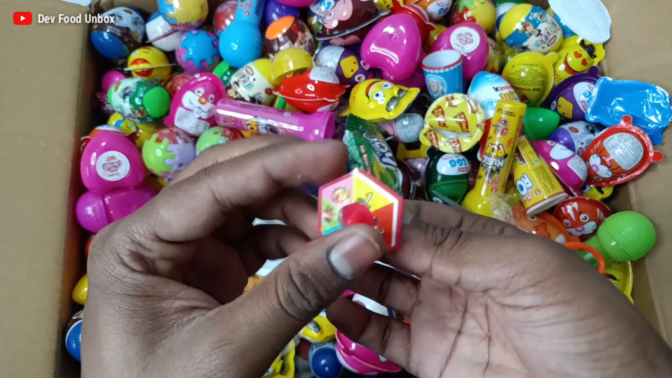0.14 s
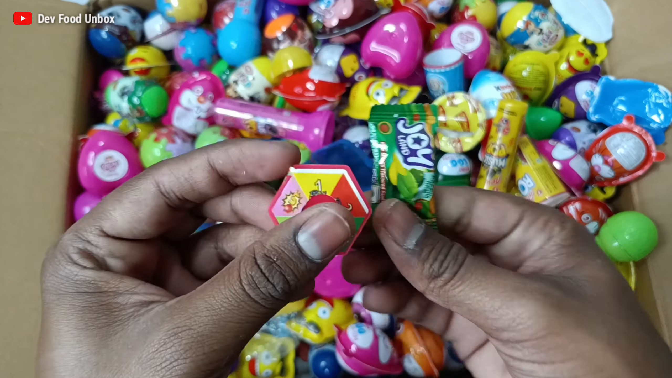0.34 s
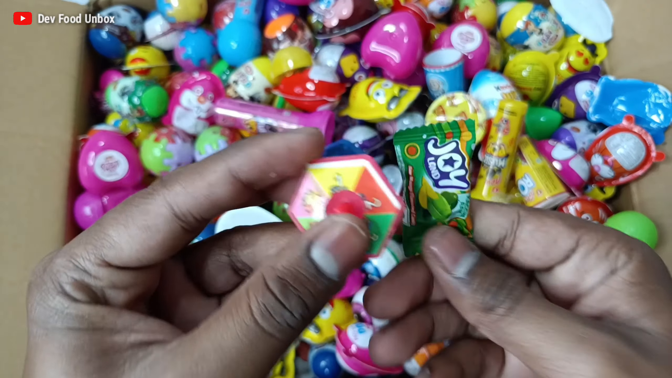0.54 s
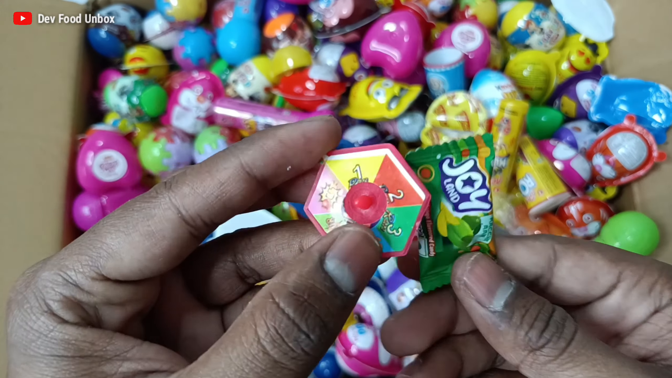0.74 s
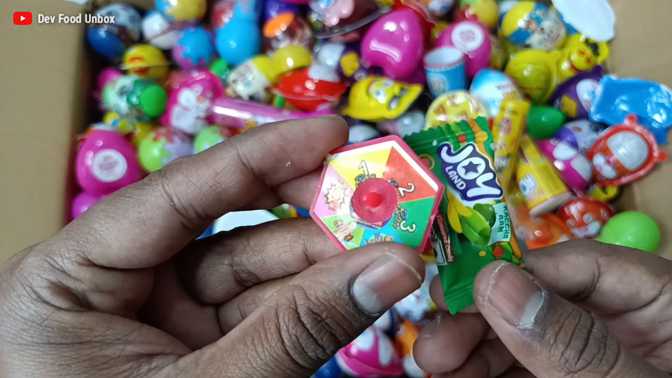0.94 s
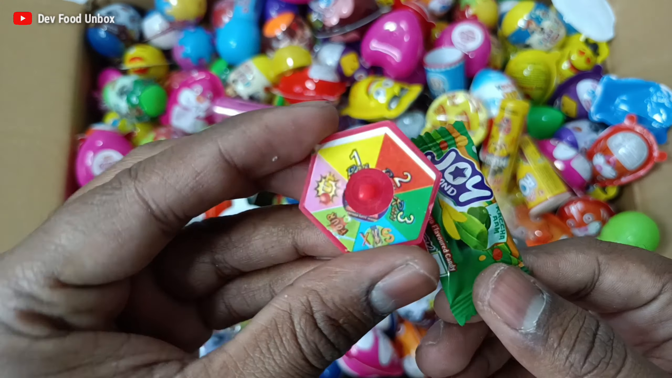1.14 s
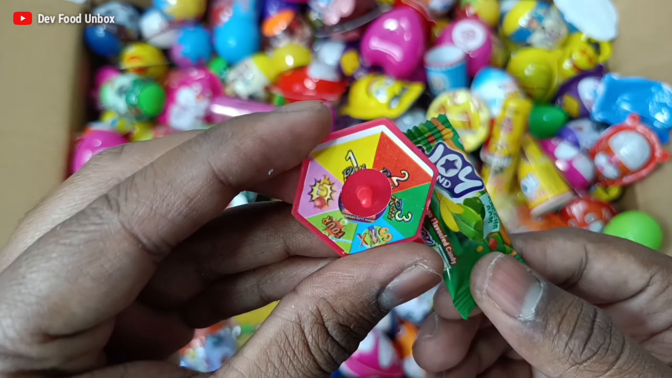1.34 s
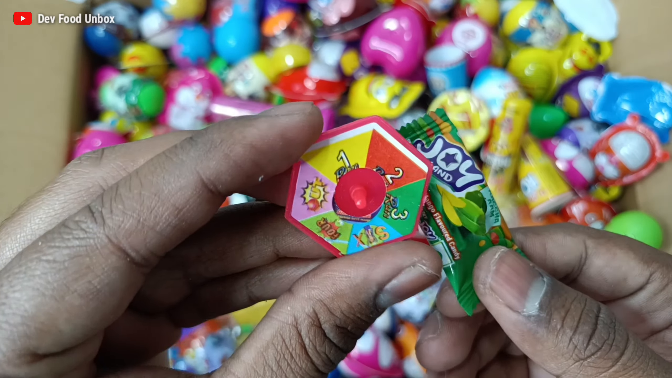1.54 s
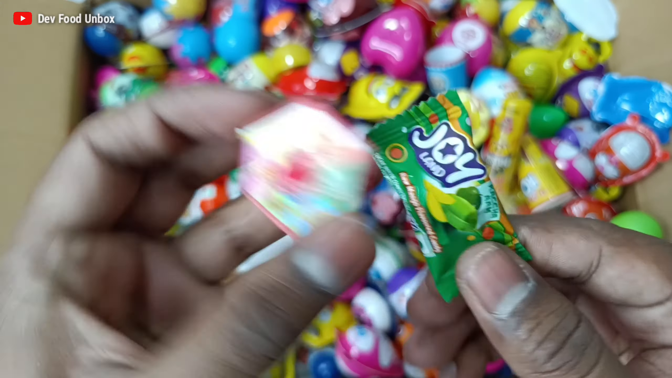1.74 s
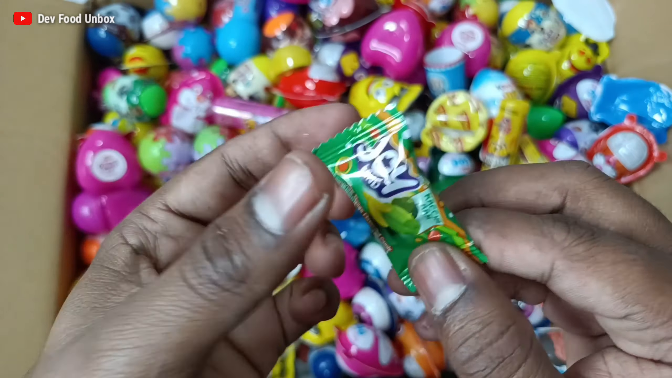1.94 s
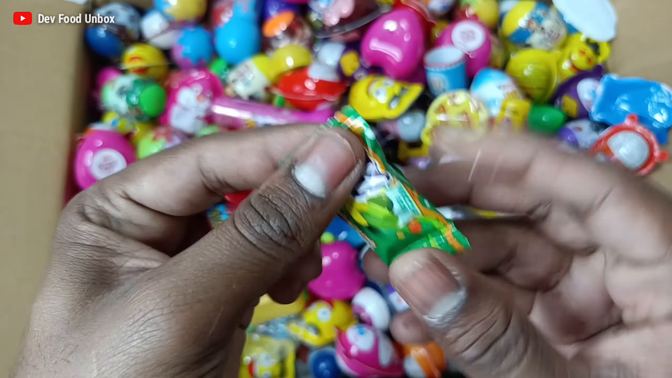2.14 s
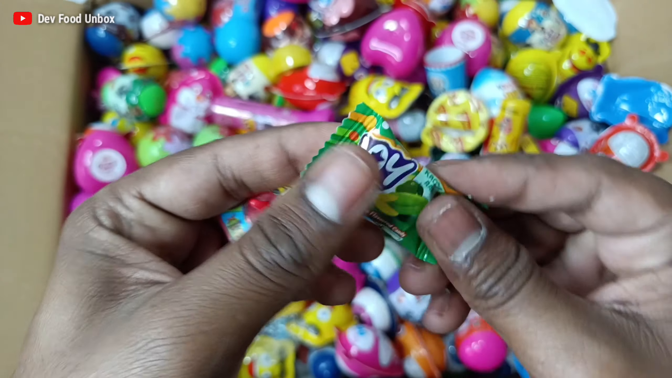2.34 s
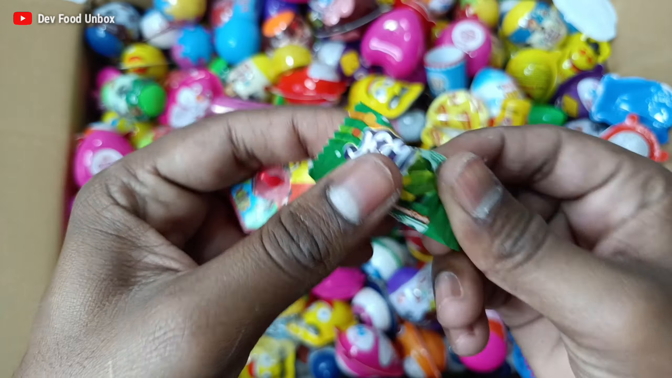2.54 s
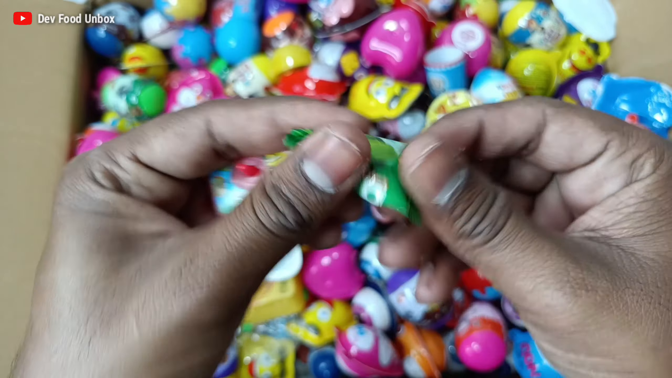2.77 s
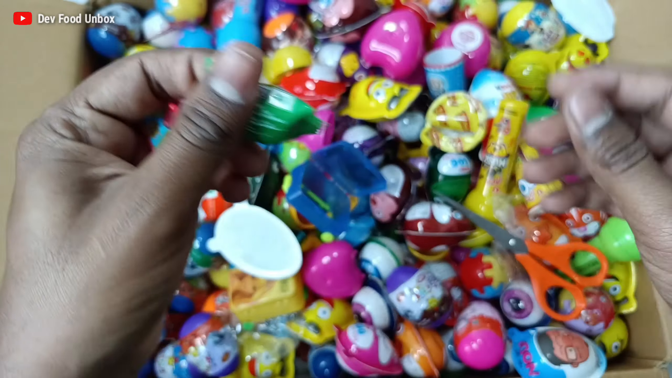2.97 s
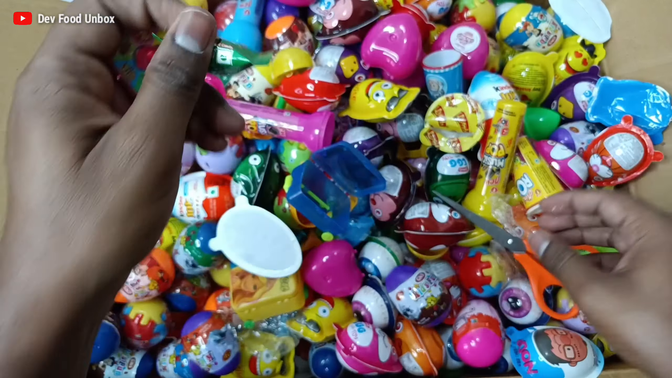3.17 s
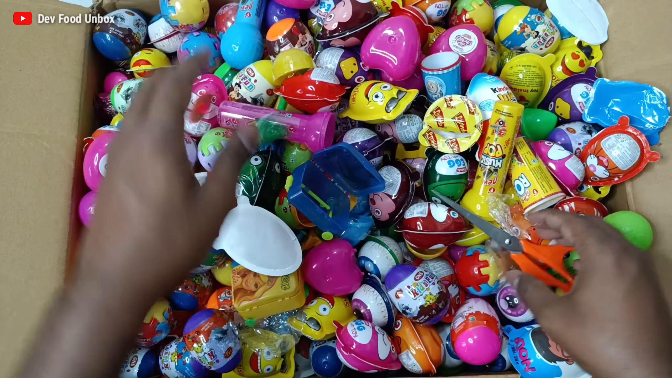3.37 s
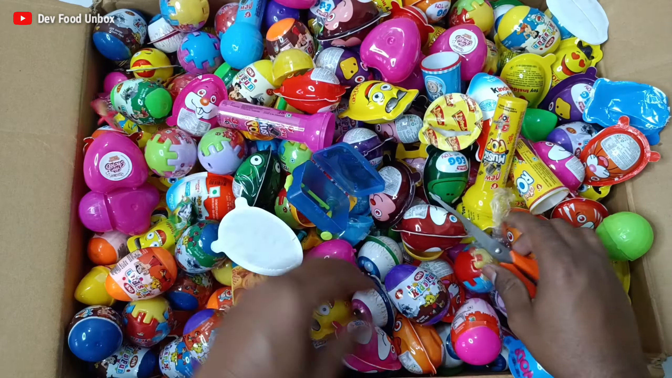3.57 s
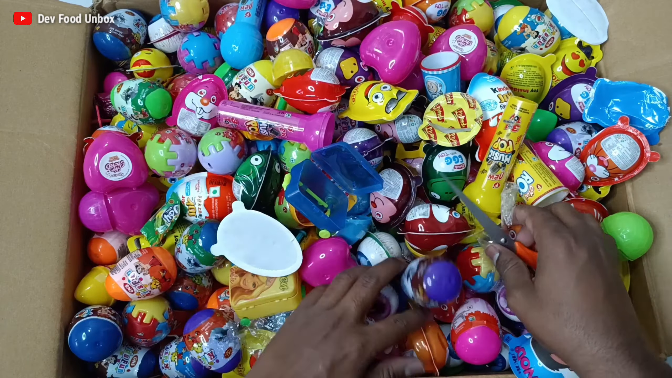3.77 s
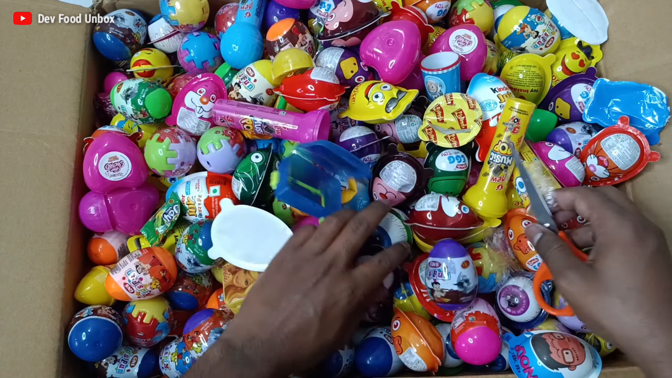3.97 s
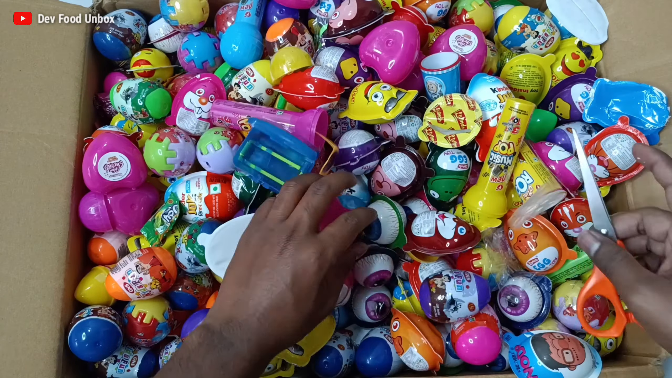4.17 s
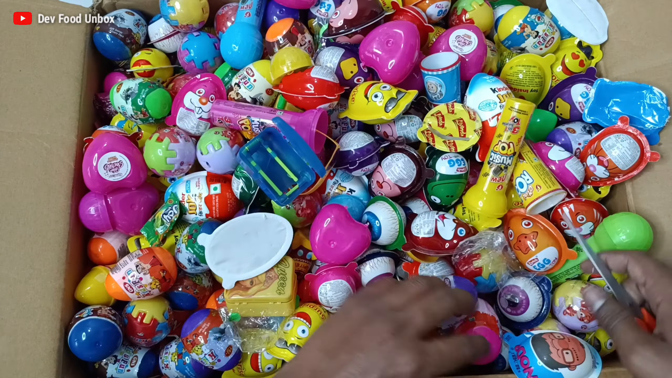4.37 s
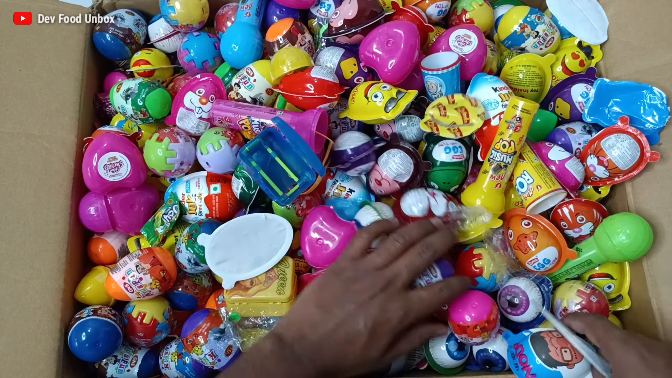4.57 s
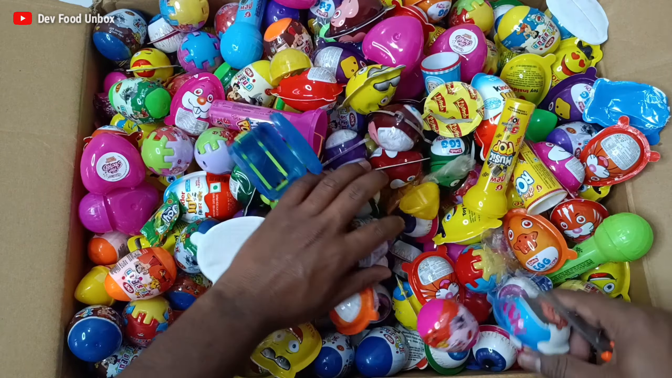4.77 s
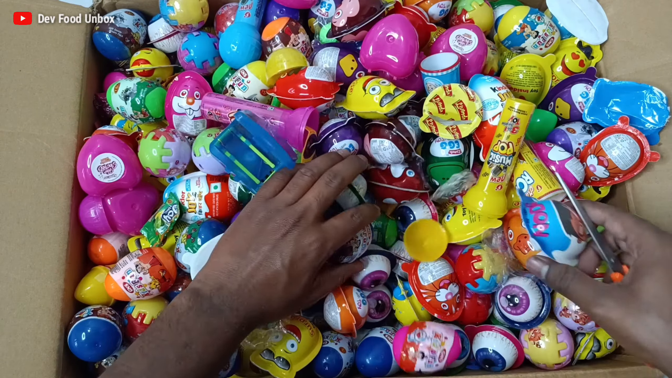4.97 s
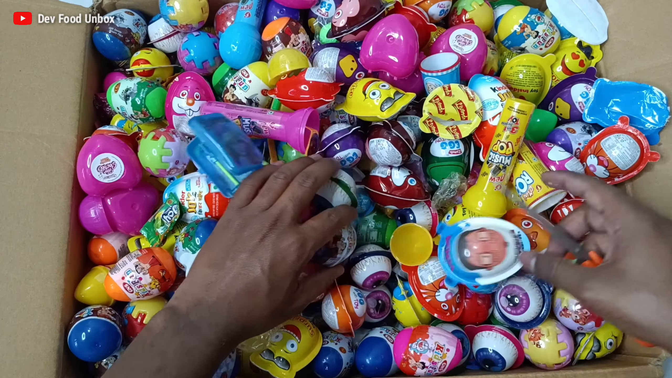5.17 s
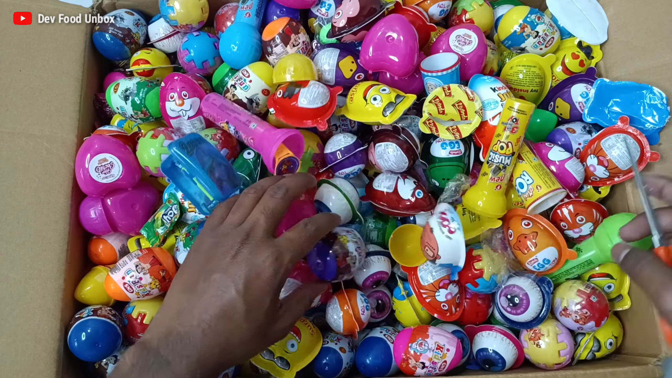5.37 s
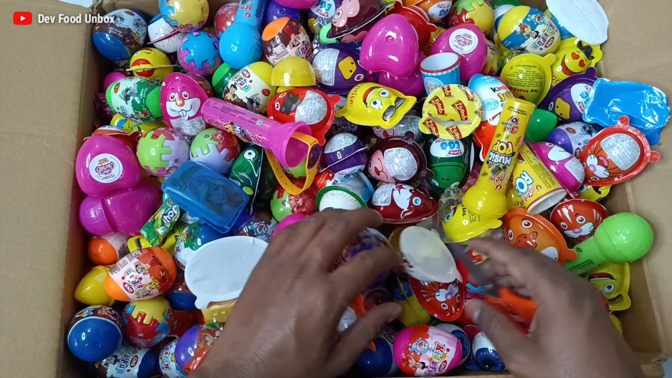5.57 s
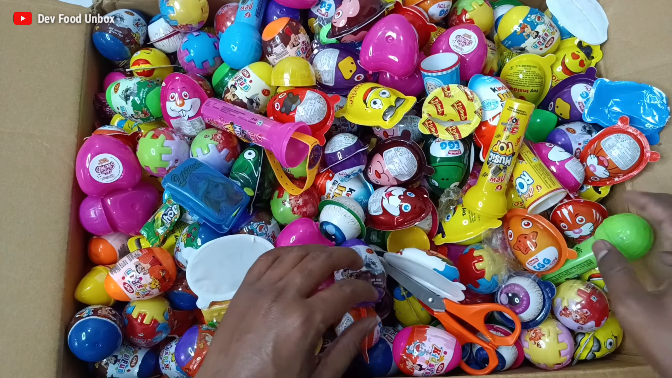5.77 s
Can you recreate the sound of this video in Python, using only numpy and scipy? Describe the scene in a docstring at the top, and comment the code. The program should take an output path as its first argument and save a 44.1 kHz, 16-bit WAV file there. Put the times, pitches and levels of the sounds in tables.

```python
"""Film wrapper snaps and crackles close up over faint air, then stirs again; a rummage through hollow toys follows.
Snaps are short ringing pulses let go in uneven steps; crackle, heap and fingers are random puffs of noise.
The packet thumps and shells knock as decaying sines with a noise tick, the cardboard box booms as resonant noise,
and a scissor hinge squeaks once as a wobbling harmonic tone.
A hard room answers with short bright tails of noise, and one wall with a single echo."""
import sys
import numpy as np
from scipy import signal
from scipy.fft import rfft, irfft, next_fast_len
from scipy.io import wavfile
from scipy.ndimage import uniform_filter1d

SR = 44100
rng = np.random.default_rng(int(sys.argv[2]) if len(sys.argv) > 2 else 0)


def master(y):
    """Save y as 16-bit WAV."""
    cut = np.clip(np.atleast_2d(y).T, -1, 1)
    pcm = np.round(cut * 32767)  # scale
    wavfile.write(sys.argv[1], SR, pcm.astype(np.int16))


N = 256220  # length in samples

# Levels are mix settings; the functions may trim them by a fixed amount.
# Background air: f/Hz, relative level per Hz/dB
AIR_SPECTRUM = [(20, -12), (50, -17), (73, 3.5), (95, -6), (145, -5), (230, -7), (300, -10.5), (480, -14.5),
                (700, -17.5), (1800, -23.5), (4000, -28), (16000, -35)]
AIR_DB = -63.5  # rms
# Dull rub of fingers, one curve per passage: t/s, level/dB
HAND_RUB = [
    [(0.038, -34.5), (0.126, -60), (0.65, -61.5), (1.004, -71.5), (1.1, -67)],
    [(2.15, -67), (2.236, -53), (2.356, -62), (2.904, -50.5), (3.092, -65.5), (3.352, -57), (3.5, -56)],
]
# Film crackle before it is split by pitch: f/Hz, relative level per Hz/dB
FILM_SPECTRUM = [(290, -30), (500, 6), (668, -19.5), (843, -7), (2260, -3), (4660, -0.5), (5090, -1),
                 (5880, -2.5), (14500, -18.5), (16000, -18)]
# Fingers squeeze the film: t of peak/s, level/dB, time to die by 30 dB/s, brightness/dB
SQUEEZES = [(0.053, -48, 0.28, -2.5), (0.355, -61, .06, -5), (0.394, -53.5, 0.11, -4), (0.7, -52, .1, 0),
            (2.23, -47, .1, 5), (2.355, -45, 0.2, -4), (2.435, -39.5, 0.16, 2), (2.585, -44.5, 0.03, 7),
            (2.615, -37.5, .3, 3), (2.7, -45, .15, 0), (2.795, -38, 0.05, 5), (2.835, -37.5, .15, -5.5),
            (2.88, -39, 0.33, 3), (2.97, -48, 0.04, 1.5), (3.08, -60, .12, -5), (3.252, -49.5, 0.3, 4.5),
            (3.325, -44.5, 0.4, -0.5), (3.502, -37, 0.13, -3.5)]
SQUEEZE_RISE_S = .015  # time to grow by 30 dB
RUSTLE_TREBLE_DB, RUSTLE_LOW_DB = 6, 7  # trims against the middle of the crackle
# A faint brush of film: t/s, level/dB
STIR = [(1.92, -94), (1.945, -67), (1.97, -69), (2.01, -93)]
# A hand pushes through the heap, one curve per passage: t/s, effort level/dB, then against effort:
# shells level/dB, box boom level/dB, wrappers level/dB; last, wrapper brightness/dB
RUMMAGE = [
    [(0.038, -38, -5, -0.6, -11, 3), (0.112, -38, -5, -1.5, -11, -2.5), (0.19, -48.5, -12, -2, -12, 0),
     (0.218, -52, -11, 9.5, -15, 0), (0.25, -76, 5, -6, -9, 0)],
    [(3.5, -38.5, -15, -6, -5, -0.5), (3.56, -32, -16, -7.5, -9.5, 0), (3.65, -34, -3, -13, -8, 1),
     (3.73, -41, 2.5, 3, -3, 2.5), (3.81, -33.5, -2.5, -5.5, -12.5, 1.5), (3.9, -33, -1.5, -5, -13, 0),
     (3.98, -30, 0.5, -9, -15, 1), (4.09, -28, 0.5, -11, -16, -2), (4.22, -28, -7.5, -7, -12.5, -4),
     (4.38, -44, -2.5, -3, -8.5, 0), (4.42, -50, -1.5, 9, -5, -1), (4.53, -56, 3, 0, -8.5, -2.5),
     (4.615, -45.5, 0, 5.5, -10.5, -1), (4.635, -35.5, 6, 4, -11.5, 0), (4.7, -26, -3, -18, -15, 0),
     (4.77, -22.5, -7, -22.5, -14, -2), (4.9, -27.5, -9, -12, -13.5, -1.5),
     (4.99, -34, 0.5, -6, -10.5, -3.5), (5.02, -42.5, 0, -3, 4, -6), (5.08, -37.5, 3.5, 0.5, -9.5, -5.5),
     (5.165, -36, -3, -6, -12, -9), (5.185, -36, -3, -6, -9, 3), (5.28, -34.5, -5, -13.5, -12.5, -2),
     (5.47, -42.5, -5, -11, -11, -1.5), (5.51, -33, -7, -18, -15.5, 0), (5.64, -33, -1, -8, -16, -1),
     (5.68, -44, -5, -10, -10, -3), (5.73, -25, -3.5, -8, -12.5, -2), (5.81, -28.5, -5, 5, -17.5, -3)],
]
# Which toys are moving: t/s, favoured shell f/Hz, favoured wall f/Hz
MOVING_TOYS = [(3.5, 500, 1600), (3.9, 540, 1120), (4.2, 480, 1560), (4.5, 400, 1360), (4.75, 380, 2200),
               (5.16, 323, 1520), (5.55, 410, 1690), (5.7, 440, 1280)]
# Resonances of shell cavities, shell walls and the cardboard box: f/Hz, width setting/Hz, level/dB
SHELL_MODES = [(310, 102, 5), (389, 93, -1), (544, 130, 1.5), (640, 178, -2.5), (212, 34, -15),
               (777, 300, -11)]
WALL_MODES = [(1005, 244, 6.5), (1252, 100, 0.5), (1458, 190, 4), (1770, 325, 3), (2200, 200, 4),
              (2500, 300, -4)]
BOX_MODES = [(119, 24, 9), (164, 42, -6.5), (76, 51, -3.5)]
# Buckling creases and sharp plastic ticks: t/s, peak level/dB, ring f/Hz, sharpness Q setting,
# broad crack setting against ring/dB, treble setting against ring/dB, room send/dB
SNAPS = [(0.039, -15.5, 3240, 5.3, -9, -34, -6), (0.0462, -16, 3120, 5.8, -1, -22, 8),
         (0.0555, -13.5, 3400, 3.5, 8, -21, -4), (0.0778, -18, 3100, 4.5, -5, -17, 4),
         (0.2708, -34, 2840, 2.8, -8, -18, -2), (0.3556, -22, 1920, 1.9, 2, -4, 0),
         (0.3934, -20, 4950, 4.5, 2, -24, -6), (0.4079, -31, 6740, 2, -6, -2, -5),
         (0.501, -33, 2640, 2.5, -9, -26, -1), (0.5324, -30, 4960, 1.3, 2, 4, -4),
         (0.5662, -33, 1500, 2, -3, -24, -1), (0.5728, -20, 3480, 0.89, 4, -9, -1),
         (0.6669, -28, 5580, 1.6, -12, -11, 4), (0.6782, -17, 5900, 3.3, -0.5, -21, -3),
         (0.6904, -7, 3600, 1.3, 5, -17, -5), (0.7784, -22, 1800, 1.1, 6, -14, -3.5),
         (0.8856, -40, 3000, 2.5, -8, 2, -1), (0.9219, -33, 1380, 3.3, -5, -32, -10),
         (0.9613, -21, 1400, 2.2, -9, -21, -7), (0.965, -30, 4830, 2.2, -10, -7, 3.5),
         (1.8607, -50, 9830, 2.8, -10, -3, -3), (2.0341, -50, 1910, 2.1, -16, -17, -10),
         (2.08, -45, 3200, 2.2, -11, -24, -5), (2.1779, -25, 1650, 1.8, -2.5, -22, -2),
         (2.2106, -16, 1910, 0.72, 1, 2, -0.5), (2.2401, -12.5, 3400, 6.8, -1, -8, -3),
         (2.2557, -21.5, 3080, 1.8, -8, -16, -9), (2.3396, -17.5, 6050, 2.1, -6, -1, 1),
         (2.3428, -22, 2800, 2.6, -7, -10, -8), (2.3523, -7, 4300, 4.6, -4, -21, -5.5),
         (2.3748, -14.5, 6100, 4.9, -4, -11, -2), (2.389, -20.5, 3100, 0.91, -8, -21, -3),
         (2.399, -20, 5870, 1.9, -10, -15, -3), (2.406, -25, 6000, 2.6, -9, -3, -5),
         (2.4171, -12, 7340, 2.5, 3, -9, -6), (2.4296, -12.5, 2200, 8.7, -14.5, -22, -8),
         (2.4324, -9, 5040, 1.5, -4, -7, -8), (2.442, -21, 4700, 1.5, -8, -11, -12),
         (2.53, -22, 5400, 2, 2, -18, -11), (2.5536, -22, 5940, 2.9, -15, -11, -9),
         (2.5696, -12.5, 6900, 3, 1, 2, -3), (2.5965, -1.5, 3500, 1.3, 2, -22, -4),
         (2.6957, -13, 4380, 3.3, -11, -2, 0), (2.746, -19, 5360, 2.5, -1, -3, -5),
         (2.7742, -22, 2440, 3.4, -10, -19, -8), (2.788, -14, 5470, 2.1, -5, -13, 0),
         (2.7948, -8, 6760, 3.8, 7, -8, 0), (2.8056, -11, 3500, 3.4, -5, -17, -12),
         (2.824, 3.5, 2370, 2.7, -7, -33, -10.5), (2.8327, -5.5, 5240, 2.2, -13, -20, -1),
         (2.896, -15.5, 6100, 2.6, -2, -11, 1), (2.929, -16, 5400, 1.4, -2, -6, 1),
         (2.9612, -15, 4460, 1, 2, -1, 0), (3.0283, -22, 6740, 2.5, 2, -7, -9),
         (3.0764, -22.5, 1800, 1.5, 1, -22, -3), (3.1742, -36, 3340, 1.9, -18, -13, -7),
         (3.2488, -19.5, 8450, 2.2, -4, 0, -7), (3.2595, -26.5, 9670, 3, 3, -1, -3),
         (3.2775, -32, 4200, 2.6, -9, -10, -5), (3.2985, -28, 1850, 5, -8, -17, -9),
         (3.314, -15, 5130, 2.1, -4, -15, 1.5), (3.343, -16.5, 4000, 2.3, -1, -7, -4),
         (3.3502, -16.5, 6840, 4.1, -3, -11, 9.5), (3.3646, -17, 1950, 4, -12, -16, -1.5),
         (3.4342, -23, 3930, 2.1, -1, -21, 0), (3.442, -18.5, 3920, 1.4, 3, -12, -10),
         (3.4974, 2, 3400, 7, -2, -35, -0.5), (3.6885, -17.5, 8300, 3.9, -10, -19, 4),
         (3.736, -15.5, 8650, 3.9, -15, -7, -12), (3.808, -19, 9250, 2.5, 3, 2, -8),
         (3.8314, -19, 9500, 2.1, -10, 3, -8), (3.8803, -18, 2200, 3.6, -8, -14, 7),
         (4.061, -18.5, 3560, 3.8, -4, -18, 5.5), (4.1613, -17, 1610, 2.5, -15, -27, 3),
         (4.3943, -16, 1486, 5, -25, -31, -7), (4.4957, -30, 4820, 1.7, -4, -19, -3),
         (4.5546, -39, 2990, 3, -3, -9, 5), (4.6273, -24.5, 4360, 3.7, -6, -19, 0),
         (4.651, -14, 8400, 2.1, 2, -3, 1), (4.7047, -15, 2350, 3.6, -3, -19, 8),
         (4.806, -14.5, 2040, 3.4, -5, -13, 6), (5.003, -1, 4350, 6.5, -6, -22, 2.5),
         (5.0421, -10.5, 4200, 4.4, -15, -17, 3), (5.174, -29, 9000, 3, -9, -2, -1),
         (5.182, -7, 9300, 3.3, -8, 5, 0), (5.1946, -17, 9200, 3.7, -10, 0, -5),
         (5.2204, -18, 1790, 5.6, -13.5, -16, 1.5), (5.2711, -16, 9100, 2.7, 3, -12, 3),
         (5.356, -24.5, 2300, 3.4, -12, -26, 3), (5.3663, -29, 2050, 2.7, -10, -27, 5),
         (5.4077, -29, 1880, 2.1, -11, -22, 5), (5.4578, -25, 6740, 2.4, -8, -5, 3),
         (5.5025, -20, 2200, 3.4, -4, -19, 3.5), (5.7385, -8.5, 2870, 3.7, -6, -11, -3)]
CRACK_LOW_DB = -12  # low bump setting, against the broad crack setting
THUMP_DB, THUMP_HZ = -22, 480  # push of the whole sheet, against the broad crack setting
TAIL_SHARPER, TAIL_BROAD_DB = 1.3, -1.5  # the ring outlasts the crack in the room
# Decay of the hard room: f/Hz, time to fall by 60 dB/s
ROOM_DECAY = [(100, 0.35), (500, 0.7), (1000, 0.42), (2800, 0.46), (5600, 0.4), (11000, 0.4), (16000, 0.14)]
# Low thumps of the packet, then hollow shells knocking: t/s, level/dB, low ring f/Hz, tick setting/dB
KNOCKS = [(2.2575, -43, 550, -12), (2.7945, -34, 420, 3), (3.5004, -25, 433, 11), (3.5499, -26, 586, -15),
          (3.662, -29.5, 433, 3), (3.6741, -26, 425, -7), (3.6979, -29, 640, 5), (3.7745, -17, 570, 3),
          (3.8554, -14.5, 533, 0), (3.9164, -13, 520, 3), (3.954, -11, 567, -9), (4.0084, -17.5, 520, -1),
          (4.0257, -23, 473, 4), (4.0775, -16, 537, -2), (4.1083, -21, 333, -14), (4.2867, -27.5, 346, -3),
          (4.3952, -23, 520, 9), (4.4942, -28.5, 372, -11), (4.5576, -32, 200, 5.5), (4.6294, -24, 423, 5),
          (4.6985, -14.5, 370, -20), (4.7257, -18, 292, 2.5), (4.7363, -18.5, 312, -5),
          (4.7971, -15, 565, -22), (4.8269, -15.5, 305, -25), (4.8403, -14, 310, -22),
          (4.922, -24.5, 374, 7.5), (5.0004, -25.5, 412, 12.5), (5.0373, -20.5, 344, -9),
          (5.1594, -21.5, 257, -4), (5.218, -23.5, 316, 3.5), (5.3062, -20.5, 353, -6),
          (5.3237, -25, 440, -2), (5.4044, -31, 390, 9.5), (5.5011, -29, 445, 9), (5.6184, -26.5, 336, 2),
          (5.6388, -28, 333, -14), (5.71, -23.5, 310, -5), (5.7279, -21, 475, 8), (5.7374, -11.5, 480, 5),
          (5.8011, -12.5, 525, 2.5)]
# The squeak: t/s, level/dB, mean slip f/Hz
SQUEAK = [(4.571, -73, 1400), (4.58, -46, 1080), (4.6, -56, 1160), (4.62, -53, 1106), (4.628, -64, 1600)]
# Harmonics of the squeak: multiple of slip f, level/dB
HINGE_HARMONICS = [(1, 1), (2, -1), (3, -14), (4, -9), (5, -1)]
EDGE_HZ, STEP_HZ = 16600, 15600  # band limit, and where the top edge steps down


def gain_of(db):
    """Decibels to gain."""
    return 10 ** (np.asarray(db) / 20)


def evened(x):
    """Scales to rms 1."""
    return x / np.sqrt(np.mean(x ** 2) + 1e-20)


def peaked(x):
    """Scales to peak 1."""
    return x / abs(x).max()


def read(points, hz):
    """Reads a spectrum table on a log frequency axis."""
    f, value = np.transpose(points)
    return np.interp(np.log(hz + 1), np.log(f + 1), value)


def along(tables, column):
    """Draws one column of the curves over time, at -200 dB outside them."""
    t, out = np.arange(N) / SR, np.full(N, -200.)
    for rows in tables:
        rows = np.array(rows)
        inside = (t >= rows[0, 0]) & (t <= rows[-1, 0])
        out[inside] = np.interp(t[inside], rows[:, 0], rows[:, column])
    return out


def add(mix, s, sound):
    """Mixes a sound in at s seconds."""
    part = mix[round(s * SR):][:len(sound)]
    part += sound[:len(part)]


def ring_twice(x, hz, width):
    """Two equal two-pole resonances in series, gain about 1."""
    b, a = signal.iirpeak(min(hz, SR * .45), hz / max(width, 5), SR)
    return signal.lfilter(b, a, signal.lfilter(b, a, x))


def band(x, lo_hz, hi_hz):
    """Band-pass."""
    return signal.sosfilt(signal.butter(2, [lo_hz, hi_hz], "band", fs=SR, output="sos"), x)


def shaped(x, gain_at):
    """Filters x by a gain curve over frequency, rms 1."""
    size = next_fast_len(len(x))
    hz = np.fft.rfftfreq(size, 1 / SR)
    return evened(irfft(rfft(x, size) * gain_at(hz), size)[:len(x)])


def coloured(x, points):
    """Filters x by a spectrum table, rms 1."""
    return shaped(x, lambda hz: gain_of(read(points, hz)))


def hump(hz, centre_hz, octaves):
    """Power of a smooth bump on a log axis, down to 1/e at this many octaves from the centre."""
    return np.exp(-(np.log2((hz + 1) / centre_hz) / octaves) ** 2)


def tinted(x, centre_hz, octaves):
    """The part of x under one smooth bump, rms 1."""
    return shaped(x, lambda hz: np.sqrt(hump(hz, centre_hz, octaves)))


def grains(per_s, spread_db, ms):
    """Random short puffs of noise, most small and a few large."""
    size = gain_of(spread_db * np.minimum(rng.exponential(1, N), 4))
    size = size * (rng.random(N) < per_s / SR)
    puff = np.exp(-np.arange(400) / (ms * SR / 1000))
    return signal.oaconvolve(size, puff)[:N] * rng.standard_normal(N)


def air():
    """A steady bed of noise, mostly low."""
    return gain_of(AIR_DB) * coloured(rng.standard_normal(N), AIR_SPECTRUM)


def hands():
    """Skin rubbing on skin and packet: dense puffs blur into a dull murmur."""
    rub = evened(band(grains(900, 1.5, 4), 67, 604))
    return gain_of(along(HAND_RUB, 1) - 0.5) * rub


def squeezes():
    """Gains of middle, treble and low crackle: each squeeze grows quickly and dies slowly; the heap adds its own."""
    t, power = np.arange(N) / SR, np.zeros((3, N))
    for s, db, fall_s, bright_db in SQUEEZES:
        level_db = db - 30 * np.maximum((s - t) / SQUEEZE_RISE_S, (t - s) / fall_s)
        power += gain_of(level_db + np.array([[0], [bright_db], [-bright_db]])) ** 2
    heap_db = along(RUMMAGE, 1) + along(RUMMAGE, 4)
    bright_db = np.maximum(along(RUMMAGE, 5), -40)
    power += gain_of([heap_db, heap_db + bright_db, heap_db - bright_db]) ** 2
    return np.sqrt(power) * gain_of([[0], [RUSTLE_TREBLE_DB], [RUSTLE_LOW_DB]])


def crackle():
    """Many tiny creases under the fingers; each sounds mostly low, middle or high, some everywhere."""
    shared = grains(350, 3.5, 0.28)
    low, middle, high = (coloured(shared + 0.86 * grains(300, 4.7, 0.6), FILM_SPECTRUM) for _ in range(3))
    parts = [tinted(middle, 6100, .55), tinted(high, 11030, 0.54), tinted(low, 2430, 0.93)]
    squeezed = gain_of(-6) * (squeezes() * parts).sum(0)
    brush = gain_of(along([STIR], 1)) * tinted(shared, 7700, 0.73)
    return squeezed + brush


def heap(modes, favoured_hz, octaves, per_s, spread_db, ms):
    """Each resonance gets its own bumps besides the shared ones; those near the favoured pitch move most."""
    shared = grains(per_s, spread_db, ms)
    struck, weights = [], []
    for hz, width, db in modes:
        bumps = shared + grains(per_s, spread_db, ms)
        struck.append(evened(ring_twice(bumps, hz, width * 1.9)))
        weights.append(gain_of(db) * np.sqrt(0.24 + hump(favoured_hz, hz, octaves)))
    weights = np.array(weights)
    return (weights * struck).sum(0) / np.sqrt((weights ** 2).sum(0))


def box_boom():
    """The weight of the heap shakes the box: noise through its low resonances, rms 1."""
    shake = rng.standard_normal(N)
    modes = sum(gain_of(db) * ring_twice(shake, hz, width * 1.7) for hz, width, db in BOX_MODES)
    return evened(band(modes, 58, 430))


def rummage():
    """Small bumps excite shells and their walls; the box boom follows the same effort."""
    effort_db, t = along(RUMMAGE, 1), np.arange(N) / SR
    s, shell_hz, wall_hz = np.transpose(MOVING_TOYS)
    shells = heap(SHELL_MODES, np.interp(t, s, shell_hz), .5, 80, 4.8, 1.8)
    walls = heap(WALL_MODES, np.interp(t, s, wall_hz), 0.62, 260, 3.3, 0.8)
    toys = gain_of(effort_db - 6.5) * (gain_of(along(RUMMAGE, 2)) * shells + walls)
    boom = gain_of(along(RUMMAGE, 3) + effort_db) * box_boom()
    return toys, boom


def causal(power):
    """The most compact one-sided (minimum-phase) pulse with this power spectrum."""
    cepstrum = irfft(np.log(power + 1e-7) / 2)
    # fold negative time onto positive time
    cepstrum[1:len(cepstrum) // 2] *= 2
    cepstrum[len(cepstrum) // 2 + 1:] = 0
    return irfft(np.exp(rfft(cepstrum)))[:400]


def broad_crack(hz, crack_db, treble_db):
    """Power spectrum of a crease's crack: middle, treble and low bumps, and the thump of the sheet."""
    power = gain_of(2 * crack_db - 8.5) * hump(hz, 3580, 0.85)  # doubled dB: power, not amplitude
    power += gain_of(2 * treble_db - 8.5) * hump(hz, 10600, 0.84)
    power += gain_of(2 * (crack_db + CRACK_LOW_DB) + 4.5) * hump(hz, 1400, 0.46)
    return power + gain_of(2 * (crack_db + THUMP_DB)) * hump(hz, THUMP_HZ, 0.9)


def snaps():
    """Each crease rings its panel for a few cycles and cracks broadly, letting go in uneven steps for about 1 ms."""
    near, sent = np.zeros(N), np.zeros(N)
    hz, t = np.fft.rfftfreq(1024, 1 / SR), np.arange(200) / SR
    for s, db, ring_hz, q, crack_db, treble_db, room_db in SNAPS:
        broad = broad_crack(hz, crack_db, treble_db)
        pulse = peaked(causal(hump(hz, ring_hz, 0.99 / max(q, .5)) + broad))
        tail_ring = hump(hz, ring_hz, 0.96 / max(q, .5) / TAIL_SHARPER)
        lasting = causal(tail_ring + gain_of(2 * TAIL_BROAD_DB) * broad)
        release = (t == 0) + 0.53 * rng.standard_normal(len(t)) * np.exp(-t / 0.00086)
        add(near, s, gain_of(db - .5) * peaked(np.convolve(pulse, release)))
        # the room send carries the energy of the pulse
        add(sent, s, gain_of(db + room_db) * lasting * np.linalg.norm(pulse) / np.linalg.norm(lasting))
    return near, sent


def room(x):
    """Three dense tails fed in turn, each band dying at its own speed.

    They swell within 2 ms, sink until 9 ms and partly rise again by 11 ms."""
    hz, t, z = signal.stft(rng.standard_normal((3, SR // 2)), SR, nperseg=128)
    decay = gain_of(-60 * t / read(ROOM_DECAY, hz)[:, None])
    tails = signal.istft(z * decay, SR, nperseg=128)[1]
    age = np.arange(tails.shape[1]) / SR
    tails = tails * np.interp(age, [0, .002, .009, .011], [0.022, 0.99, 0.3, 0.51])
    turn = np.arange(N) / SR * 9  # radians
    wet = np.zeros(N)
    for k, tail in enumerate(tails):
        share = np.sqrt(2 / 3) * np.cos(turn + k * np.pi / 3)  # the three powers sum to 1
        wet += signal.oaconvolve(x * share, tail / np.linalg.norm(tail))[:N]
    return wet


def wall_echo(near, hits):
    """One wall returns each blow once, 11.5 ms later."""
    wall = np.zeros(N)
    add(wall, .0115, gain_of(-20) * near + gain_of(-9.0) * hits)
    return wall


def knocks():
    """Packet thumps and shell knocks: a soft blow sounds a short low ring with a noise tick."""
    out, t = np.zeros(N), np.arange(2000) / SR
    for s, db, hz, tick_db in KNOCKS:
        low_ring = t / 0.0016 * np.exp(1 - t / 0.0014) * np.sin(2 * np.pi * hz * t)
        burst = rng.standard_normal(len(t)) * np.exp(-t / 0.0019)
        tick = peaked(band(burst, 795, 1430))
        add(out, s, gain_of(db + 0.05) * (low_ring + gain_of(tick_db - 7.5) * tick))
    return out


def squeak():
    """A dry hinge slips almost regularly: harmonics of a slightly wobbling slip rate."""
    s, db, hz = np.transpose(SQUEAK)
    t = np.arange(N) / SR
    wobble = 1 + .12 * uniform_filter1d(rng.standard_normal(N), 150)
    turns = np.cumsum(np.interp(t, s, hz) * wobble) / SR
    tone = sum(gain_of(part_db) * np.sin(2 * np.pi * multiple * turns) for multiple, part_db in HINGE_HARMONICS)
    return gain_of(np.interp(t, s, db, -200, -200)) * tone


def scene():
    """Mixes near sounds, wall echo and room over air; snaps have their own room sends."""
    near, sent = snaps()
    film, hits = crackle(), knocks() + squeak()
    toys, boom = rummage()
    wet = room(sent + gain_of(-1.0) * film + gain_of(-1.5) * hits + gain_of(-1.0) * toys)
    direct = near + film + hits + toys + boom + hands()
    handled = band(direct + wall_echo(near, hits) + wet, 55, 20000)
    return (handled + air())[None]


def record(dry):
    """Soft overload on the loudest snaps, a top edge that steps down, then the band limit."""
    drive = dry / .9
    soft = .9 * np.tanh(drive + drive ** 3 / 3)
    step = signal.firwin(511, STEP_HZ, window=("kaiser", 6), fs=SR)
    below = signal.oaconvolve(soft, step[None], "same")
    stepped = below + gain_of(-23) * (soft - below)
    edge = signal.firwin(511, EDGE_HZ, window=("kaiser", 9), fs=SR)
    return signal.oaconvolve(stepped, edge[None], "same")


dry = scene()
out = record(dry)
master(out)
```